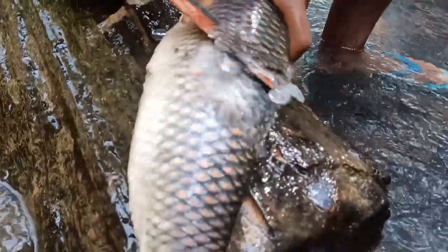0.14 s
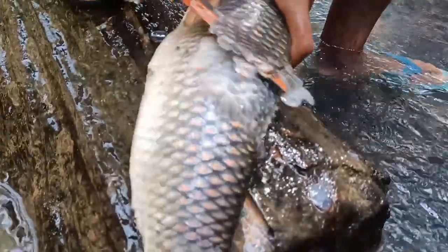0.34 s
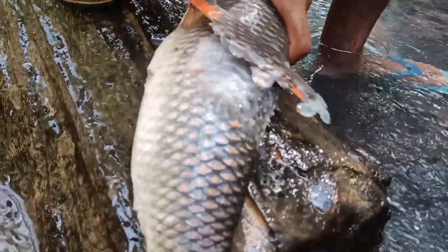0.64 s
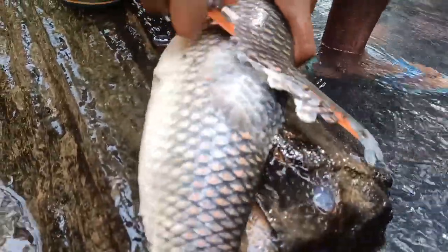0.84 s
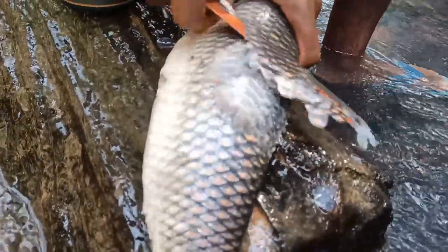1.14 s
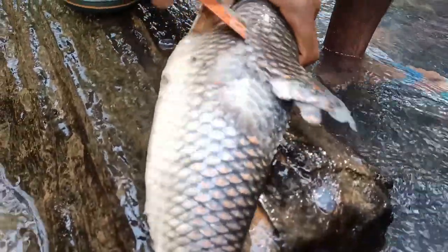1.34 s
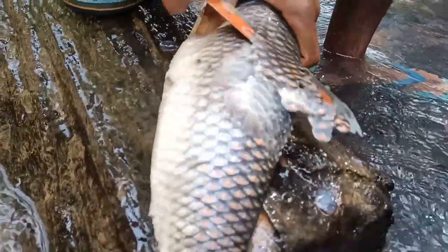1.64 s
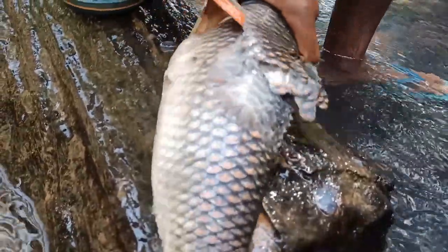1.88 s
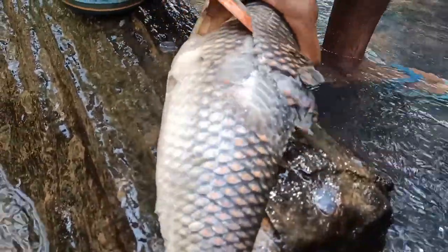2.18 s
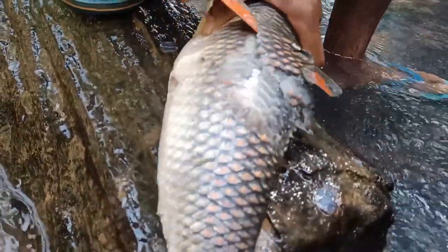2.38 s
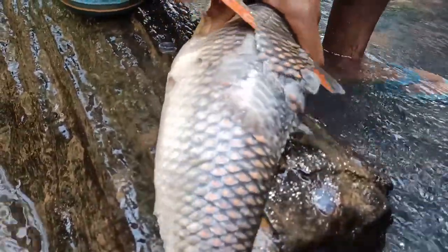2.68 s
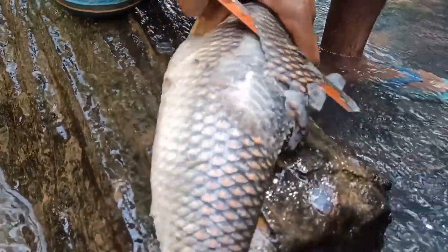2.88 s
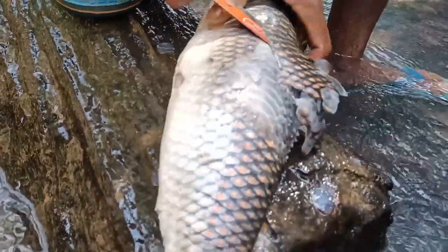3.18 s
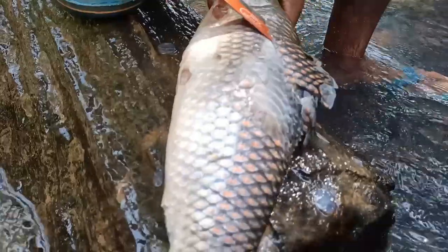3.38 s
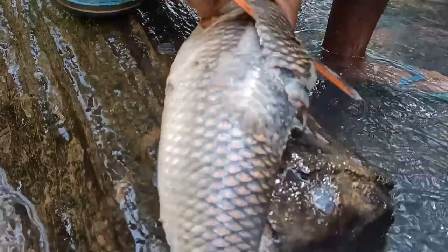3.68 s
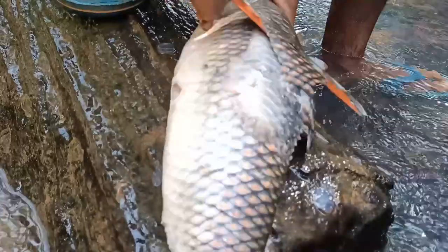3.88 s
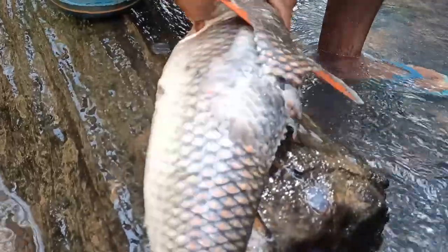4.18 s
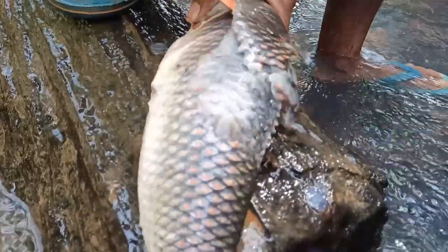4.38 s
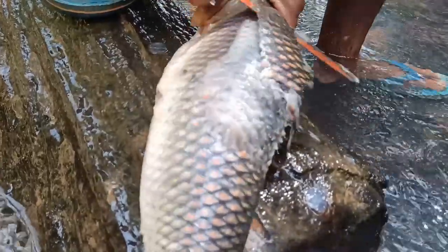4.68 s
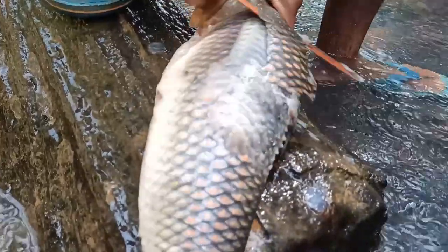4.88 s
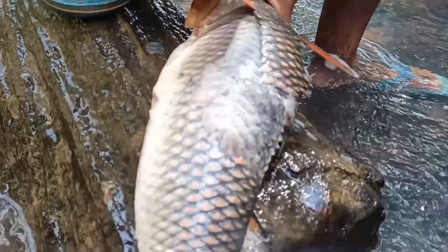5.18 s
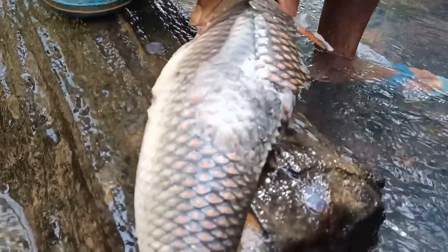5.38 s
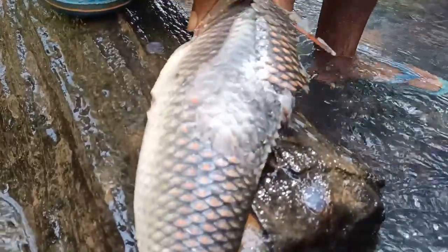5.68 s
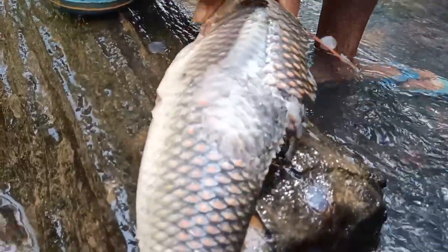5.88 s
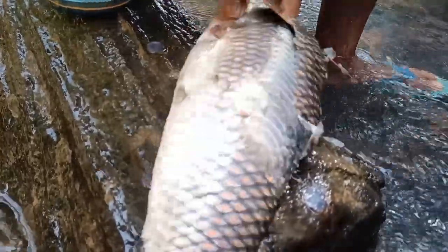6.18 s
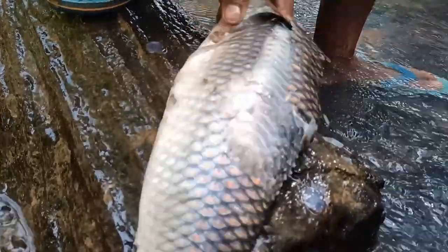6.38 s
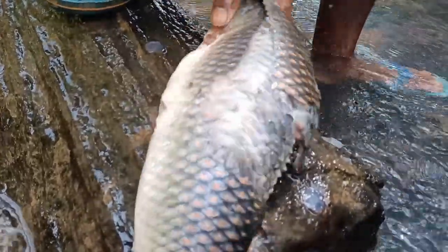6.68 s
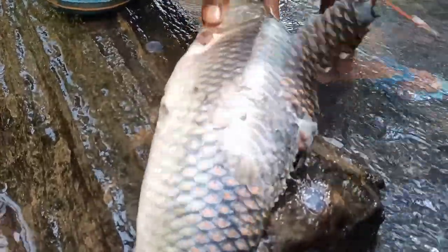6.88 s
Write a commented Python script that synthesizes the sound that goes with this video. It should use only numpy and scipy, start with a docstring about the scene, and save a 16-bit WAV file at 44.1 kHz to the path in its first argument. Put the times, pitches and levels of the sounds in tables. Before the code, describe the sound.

A knife scrapes scales off a big fish in quick, crisp strokes, with sharp little snaps and faint running water behind.

```python
"""Scaling a fish beside a stream

A knife saws to and fro under the scales of a big fish on wet planks. Each stroke is a train of tiny
impacts that swells and fades with the blade's speed; single scales snap loose and the fish knocks on
its support. Midway the blade works deep under the loosened flap, and the scrape turns hollow and louder
on the left. Behind it are quiet running water, a thin insect buzz, swells of hiss and a far bird."""
import sys
import numpy as np
from scipy import signal
from scipy.fft import rfft, irfft, next_fast_len
from scipy.io import wavfile
from scipy.ndimage import map_coordinates

SR = 44100
rng = np.random.default_rng(int(sys.argv[2]) if len(sys.argv) > 2 else 0)


def to_wav(s):
    """Save 16-bit WAV."""
    ch = np.atleast_2d(s).T  # columns
    pcm = np.round(np.clip(ch, -1, 1) * 32767)  # PCM
    wavfile.write(sys.argv[1], SR, pcm.astype(np.int16))


N = 310464

# strokes that bite and taper (jabs) or build and stop short (drags): t/s, length/s, level/dB, pressure/dB
JABS = [(-.07, .11, -27, 6), (.035, .14, -32.5, -5), (.196, 0.13, -21.5, 0.5), (.79, 0.13, -25, 1),
        (1.379, 0.13, -26, 5.5), (1.678, 0.12, -22.5, 2.5), (1.96, 0.14, -26.5, 6), (2.257, .12, -23, .5),
        (2.541, 0.13, -21, -1.5), (2.831, 0.12, -29, 4), (3.123, 0.13, -46, 4.5), (3.528, 0.17, -39, -0.5),
        (3.864, 0.1, -32, -1), (4.141, .13, -30.5, 2), (4.27, 0.16, -37.5, -1), (5.15, 0.15, -30, -2),
        (5.619, 0.13, -37.5, -1.5), (5.899, 0.15, -38, 0.5)]
DRAGS = [(.31, .16, -35.5, -4), (0.486, .13, -28, -2.5), (.632, .13, -32.5, -2), (0.909, .15, -31.5, 0.5),
         (1.08, .13, -26.5, 2.5), (1.216, .14, -29, -6), (1.511, 0.14, -30.5, -0.5), (1.795, .14, -32, 0),
         (2.072, .15, -33, 2.5), (2.358, 0.16, -37.5, -0.5), (2.665, 0.15, -29, -2.5),
         (2.959, .15, -30.5, -1.5), (3.682, .16, -39, -3.5), (3.948, 0.18, -40, -0.5),
         (4.425, 0.15, -22.5, 2), (4.572, .11, -22.5, -1.5), (4.69, .14, -28, -2.5),
         (4.852, 0.12, -25.5, 0), (4.969, .16, -31.5, -5), (5.268, .18, -37, 0), (5.447, .14, -29.5, -8.5),
         (5.764, 0.13, -33, -6), (6.114, .1, -42.5, 1.5), (6.196, 0.18, -39, -2), (6.386, 0.18, -47, -8),
         (6.639, 0.065, -40, -1)]
# spectrum of the scrape on each side: f/Hz, level/dB
SCRAPE_LEFT = [(60, -37), (430, -31.5), (590, -19.5), (770, -32), (1120, -24.5), (2150, -20), (3050, -6),
               (5700, -1.5), (7000, -6.5), (9900, -10), (10800, -3), (12500, -9), (15300, -13.5)]
SCRAPE_RIGHT = [(60, -28.5), (450, -28), (590, -19), (770, -29.5), (1200, -23.5), (1550, -27.5), (2850, -4),
                (5500, -2), (8700, -1.5), (9900, -6.5), (11200, -6), (13100, -5.5), (15300, -13.5)]
BLADE_MODES = [(3010, 300, 1), (7610, 260, -3), (9130, 280, .5), (11770, 400, 1)]  # resonances of blade and grip: f/Hz, width/Hz, gain/dB
PRESSURE_GAIN = [(300, 0.82), (590, 1.28), (850, 0.95), (1500, 0.83), (2400, 1.2), (3000, 0.61), (4000, 0)]  # pressing shakes the fish's body more: f/Hz, gain/(dB per dB)
FLAP_DEPTH = [(0, 0.14), (.6, 0.36), (1.4, 0.24), (3.1, 0), (3.56, 0.94), (4.52, 1), (4.63, 0.51),
              (4.76, 1), (5.1, .95), (5.35, 0.25), (5.85, 0.2), (6.5, 0.32)]  # reach of the blade under the flap: t/s, depth (0-1)
FLAP_COLOUR = [(600, -4.5), (850, -0.5), (1200, 7.5), (1700, 5), (2200, 1.5), (3000, -9.5), (4200, -1.5),
               (6000, 0), (8200, 1), (11000, -4)]  # filtering by the flap at full depth: f/Hz, gain/dB
POCKET_PITCH = [(1.2, 4500), (1.7, 6550), (3, 6000), (3.6, 4400), (4.35, 4300), (4.5, 6070), (5.55, 6700),
                (6.3, 4800)]  # resonance of the pocket between blade and flap: t/s, f/Hz
TREBLE_GAIN = [(.1, 1), (.7, -3), (.86, 6), (1.15, 4), (1.42, 4.5), (1.6, -1), (2.3, -4), (2.87, 0),
               (3.05, -4.5), (3.78, -4), (4.03, 2.5), (4.35, -1.5), (4.85, 2.5), (5.52, -2.5), (5.7, 2),
               (6.3, 6.5)]  # top treble of the scrape: t/s, gain/dB
BLADE_CONTACT = [(0, 3.25), (3.53, 6.7)]  # the blade lies on the fish: start t/s, end t/s
SNAPS = [(.0483, -26.5, 6700), (0.0753, -9.5, 6850), (0.1823, -26, 5300), (.218, -5.5, 6900),
         (0.5873, -4.5, 4700), (0.6266, -20, 8660), (0.7195, -7, 5300), (.794, -28, 5950),
         (1.7125, -14, 6300), (2.2901, -10, 6000), (2.412, -14.5, 4800), (3.098, -9, 7550),
         (3.259, -25.5, 4700), (3.7187, -16.5, 4700), (3.7937, -11.5, 4700), (3.8034, -9, 4700),
         (3.9922, -16.5, 4950), (4.0597, -17, 4400), (4.1698, -12, 6300), (4.5902, -12, 5330),
         (4.606, -3, 8100), (4.975, -22, 5330), (5.013, -17, 5700), (6.082, -32.5, 4600),
         (6.306, -8.5, 8460), (6.676, -15.5, 4100)]  # scales tearing loose: t/s, relative level/dB, f/Hz
SNAP_SPECTRUM = [(100, -35), (1000, -29), (2500, -6.5), (5000, 4), (9000, -3), (15000, -7.5)]  # tick of a scale: f/Hz, level/dB
KNOCKS = [(0.5864, -17.5), (2.2904, -22.5), (3.7928, -15.5), (3.8029, -15), (3.9927, -24), (4.2483, -20),
          (4.606, -17), (6.674, -18.5)]  # the fish bumps its support: t/s, level/dB
KNOCK_SPECTRUM = [(40, -9.5), (200, -13), (600, -8.5), (1600, -4), (3000, -6), (8000, -65.5)]  # thud of the fish: f/Hz, level/dB
STREAM_SPECTRUM = [(25, 0), (150, -0.5), (450, -2.5), (800, -7.5), (1600, -14), (3000, -5.5), (6000, -11.5),
                   (10000, -14.5), (15500, -17.5)]  # running water: f/Hz, level/dB
STREAM_COHERENCE = [(50, 0.11), (300, 0.24), (1000, .3), (4000, .05)]  # left-right likeness of the water: f/Hz, correlation
NEAR_BUBBLES = [(4.005, 485, -51), (5.735, 935, -60)]  # single plops: t/s, f/Hz, level/dB
HISS_SWELLS = [(3.45, 0.1, -62), (6.48, 0.18, -59.5), (6.978, 0.4, -63.5)]  # thin wet hiss: peak t/s, length/s, level/dB
BIRD_CALLS = [(0.564, 0.26, 1136, -65.5, 1), (2.048, 0.21, 1104, -66, 0.7), (3.264, 0.24, 1036, -70, 0.38),
              (4.808, 0.22, 1030, -72.5, 0.04), (6.181, 0.203, 1030, -71.5, 0.48),
              (6.88, .067, 1170, -75.5, .3)]  # far calls: t/s, length/s, f/Hz, level/dB, hoarseness (0-1)

OPEN_LEAD_MS, DEEP_LEAD_MS = 0.11, 0.262  # the sound arrives earlier on the right
HAND_PRESSURE_DB = 1.5  # the hand's weight, added to every stroke


def scraping(strokes, fastest_at, grip_speed, slip_db, rise_power, fall_power):
    """Friction: the blade slips, then bites, and the amplitude follows a power of its speed."""
    out = np.zeros((2, N))
    for start, length, db, pressure_db in strokes:
        progress = np.linspace(0, 1, int(length * SR))
        speed = np.abs(np.sin(np.pi * np.interp(progress, [0, fastest_at, 1], [0, .5, 1])))
        bite = amp(np.interp(speed, [grip_speed, grip_speed + .03], [slip_db, 0]))
        force = np.where(progress < fastest_at, bite * speed ** rise_power, speed ** fall_power)
        middle = start + length / 2
        grains = flicks(speed, density=1900, spread_db=4, slide_db=-3,
                        catch_rate=98, catch_db=-8.5, catch_t60=.028)
        pair = to_stereo(grains, lead_at(middle), scatter_db=1.5, scatter_t60=.023, paths=2)
        scrape = unit(filtered(pair, lambda hz: amp(blade_colour(hz, middle, pressure_db))))
        left_bias_db = np.interp(depth_at(middle), [.3, 1], [0, 3])
        add(out, start, scrape * force * amp(db + left_bias_db * np.array([[.5], [-.5]])))
    return out


def flicks(speed, density, spread_db, slide_db, catch_rate, catch_db, catch_t60):
    """Shot noise: scale edges flick past over wet sliding; each catch sets off a decaying burst."""
    n = len(speed)
    hits = rng.random(n) < density * (.3 + speed) / SR
    sizes = amp(spread_db * np.minimum(rng.standard_normal(n), 2.3)) * rng.choice([-1, 1], n)
    grains = unit(hits * sizes) + amp(slide_db) * rng.standard_normal(n)
    catches = (rng.random(n) < catch_rate / SR) * rng.exponential(size=n)
    bursts = signal.lfilter([1], [1, -amp(-60 / catch_t60 / SR)], catches)
    return unit(grains * (1 + amp(catch_db) * bursts))


def blade_colour(hz, s, pressure_db):
    """Filters in series add in dB: blade, flap, pocket and pressure shape the scrape's spectrum."""
    depth = depth_at(s)
    base = np.array([along(SCRAPE_LEFT, hz), along(SCRAPE_RIGHT, hz)])
    modes = sum(db * resonance(hz, centre, width) for centre, width, db in BLADE_MODES)
    flap = depth * along(FLAP_COLOUR, hz)
    pocket = (2 + 6 * depth) * resonance(hz, at_time(POCKET_PITCH, s), width=860)
    sizzle = along([(7500, .0055), (12500, at_time(TREBLE_GAIN, s))], hz)
    body = (HAND_PRESSURE_DB + pressure_db) * along(PRESSURE_GAIN, hz)
    return base + modes + flap + pocket + sizzle + body


def depth_at(s):
    """How far the flap covers the blade at time s."""
    return np.clip(at_time(FLAP_DEPTH, s), 0, 1)


def lead_at(s):
    """Path difference, in ms: under the flap the sound leaves by its open side, further right."""
    return np.interp(depth_at(s), [.3, .7], [OPEN_LEAD_MS, DEEP_LEAD_MS])


def to_stereo(x, lead_ms, scatter_db, scatter_t60, paths):
    """Direct sound plus scattering off fish, hands and planks, by paths that switch as the blade moves."""
    n = len(x)
    direct = filtered(x, lambda hz: np.exp(1j * np.pi * hz * lead_ms / 1000 * np.array([[-1], [1]])))
    path = rng.integers(paths, size=n // 128 + 1).repeat(128)[:n]
    scatter = sum(signal.fftconvolve([x * (path == k)], echoes(scatter_t60, size=1024), axes=1)[:, :n]
                  for k in range(paths))
    # long waves pass small obstacles by
    return direct + amp(scatter_db) * filtered(scatter, lambda hz: hz / (hz + 700))


def snaps(gain_db, ring_db, ring_width_hz):
    """Sudden release: a scale tears free with a sharp tick at its own resonance."""
    out = np.zeros((2, N))
    grid = np.fft.rfftfreq(512, 1 / SR)
    for s, db, hz in SNAPS:
        spectrum = np.c_[grid, along(SNAP_SPECTRUM, grid) + ring_db * resonance(grid, hz, ring_width_hz)]
        add(out, s, amp(db + gain_db) * impact(spectrum, s, scatter_db=1, scatter_t60=.009))
    return out


def knocks():
    """Impact: a jerk of the knife bumps the fish against its support."""
    out = np.zeros((2, N))
    for s, db in KNOCKS:
        add(out, s, amp(db) * impact(KNOCK_SPECTRUM, s, scatter_db=3.5, scatter_t60=.025))
    return out


def impact(spectrum, s, scatter_db, scatter_t60):
    """A sharp contact radiates the body's impulse response, here in stereo with energy 1."""
    impulse = 1.0 * (np.arange(2048) == 32)
    arrivals = to_stereo(impulse, lead_at(s), scatter_db, scatter_t60, paths=1)
    pair = signal.lfilter(impulse_response(spectrum), 1, arrivals)
    return pair / np.linalg.norm(pair)


def slime_and_loose_scales(ticks_per_s, tick_db, spread_db, drag_db):
    """Light friction: the blade drags in slime and loose scales tick, even between strokes."""
    t = np.arange(N) / SR
    touching = sum((t >= a) & (t < b) for a, b in BLADE_CONTACT)
    start, length, level_db, _ = np.transpose(sorted(map(tuple, [*JABS, *DRAGS])))
    effort = touching * amp(np.interp(t, start + length / 2, level_db))
    hits = rng.random(N) < ticks_per_s / SR
    ticks = hits * amp(tick_db + spread_db * np.minimum(rng.standard_normal(N), 2))
    drag = amp(drag_db + 4 * wobble(11, N)) * rng.standard_normal(N)
    pair = to_stereo((ticks + drag) * effort, OPEN_LEAD_MS, scatter_db=3, scatter_t60=.037, paths=6)
    return signal.fftconvolve(pair, [impulse_response(SNAP_SPECTRUM)], axes=1)[:, :N]


def stream(db, ripple_db):
    """Shallow running water is a spread-out source: partly coherent noise, widest in the treble."""
    def mid_side_gain(hz):
        angle = np.arccos(np.clip(along(STREAM_COHERENCE, hz), -1, 1)) / 2
        return amp(along(STREAM_SPECTRUM, hz)) * [np.cos(angle), np.sin(angle)]
    noise = rng.standard_normal((2, N)) * amp(ripple_db * np.array([wobble(25, N), wobble(25, N)]))
    mid, side = filtered(noise, mid_side_gain)
    return amp(db) * unit(np.array([mid + side, mid - side]))


def bubbles(faint_db, centre_hz, count):
    """Bubbles in the current are damped oscillators of rising pitch, a few near and many faint."""
    out, t = np.zeros((2, N)), np.arange(SR // 16) / SR
    faint = [(when * N / SR, centre_hz * 3 ** (high - .5), faint_db - 12 * far)
             for when, high, far in rng.random((count, 3))]
    for s, hz, db in NEAR_BUBBLES + faint:
        cycles = hz * t * (1 + 2 * t)
        ring = np.sin(2 * np.pi * cycles) * np.exp(-cycles / 11) * (1 - np.exp(-cycles))
        left_share = rng.uniform(.2, .8)
        add(out, s, amp(db) * np.sqrt([[left_share], [1 - left_share]]) * ring)
    return out


def insect(db, pulse_hz):
    """Amplitude modulation: a narrow band of noise buzzes in slow pulses."""
    pulses = np.cos(np.pi * pulse_hz * np.arange(N) / SR) ** 6
    return amp(db + 2 * wobble(9, N)) * pulses * noise_band(8130, half_width_hz=190)


def hiss(ring_db):
    """Band-limited noise comes and goes; a narrower band makes it ring slightly."""
    t = np.arange(N) / SR
    swells = sum(amp(db) * np.exp(-np.square(np.pi * (t - s) / length)) for s, length, db in HISS_SWELLS)
    broad = noise_band(5160, half_width_hz=1200)
    return swells * (broad + amp(ring_db) * noise_band(4430, half_width_hz=200))


def bird(trill_hz, trill_depth, rise):
    """Modulation: a trill pulses a far bird's rising tone, and pitch jitter makes it hoarse."""
    out = np.zeros((2, N))
    for start, length, hz, db, hoarseness in BIRD_CALLS:
        n = int(length * SR)
        progress = np.linspace(0, 1, n)
        trill = np.sin(2 * np.pi * trill_hz * np.arange(n) / SR)
        jitter = .075 * hoarseness * wobble(330, n)
        pitch = hz * (1 + rise * (progress - .5) + trill_depth * trill + jitter)
        envelope = np.sqrt(np.abs(np.sin(np.pi * progress))) * (1 + .57 * trill)
        call = unit(np.sin(2 * np.pi * np.cumsum(pitch) / SR) * envelope)
        add(out, start, amp(db) * np.array([call, call]))
    return out


def amp(db):
    return 10 ** (np.asarray(db) / 20)


def unit(x):
    return x / np.sqrt(np.mean(x ** 2) + 1e-20)


def at_time(points, s):
    return np.interp(s, *np.transpose(points))


def along(points, hz):
    """Interpolation on a logarithmic frequency axis."""
    f, values = np.transpose(points)
    return np.interp(np.log(hz + 1), np.log(f + 1), values)


def resonance(hz, centre, width):
    """A Lorentzian bell, 1 at its centre."""
    return 1 / (1 + (2 * (hz - centre) / width) ** 2)


def wobble(rate, size):
    """A smooth random curve, rate knots a second."""
    return map_coordinates(rng.standard_normal(int(size * rate / SR) + 4), [np.arange(size) * rate / SR])


def filtered(x, response):
    """Linear filtering: the spectrum of x times a frequency response."""
    n = x.shape[-1]
    padded = next_fast_len(n + 4096)
    return irfft(rfft(x, padded) * response(np.fft.rfftfreq(padded, 1 / SR)), padded)[..., :n]


def noise_band(hz, half_width_hz):
    """Band-pass stereo noise of rms 1."""
    return unit(filtered(rng.standard_normal((2, N)), lambda f: 1 / (1 + ((f - hz) / half_width_hz) ** 4)))


def impulse_response(spectrum, size=1024):
    """The minimum-phase response with this spectrum."""
    cepstrum = irfft(np.log(amp(along(spectrum, np.fft.rfftfreq(size, 1 / SR)))))
    cepstrum[1:size // 2] *= 2
    cepstrum[size // 2 + 1:] = 0
    return irfft(np.exp(rfft(cepstrum)))


def echoes(t60, size):
    """Diffuse reflections: an exponentially decaying stereo tail of energy 1."""
    tail = rng.standard_normal((2, size)) * amp(-60 * np.arange(size) / SR / t60)
    return tail / np.linalg.norm(tail, axis=1, keepdims=True)


def add(track, s, sound):
    """Mix a stereo sound in at time s."""
    i = round(s * SR)
    a, b = max(i, 0), min(i + sound.shape[1], N)
    track[:, a:b] += sound[:, a - i:b - i]


def scene():
    """Superposition of the near knife, its faint reflections off the planks and the background."""
    knife = scraping(JABS, fastest_at=.41, grip_speed=.25, slip_db=-8, rise_power=1.66, fall_power=1.75)
    knife += scraping(DRAGS, fastest_at=.67, grip_speed=.33, slip_db=-7, rise_power=1.73, fall_power=1.69)
    knife += snaps(gain_db=9.5, ring_db=14, ring_width_hz=2100) + knocks()
    knife += slime_and_loose_scales(ticks_per_s=60, tick_db=-6, spread_db=7, drag_db=-34)
    planks = amp(-25) * signal.fftconvolve(knife, echoes(t60=.1, size=SR // 2), axes=1)[:, :N]
    water = bubbles(faint_db=-62, centre_hz=520, count=60) + stream(db=-65.5, ripple_db=2.5)
    haze = insect(db=-70.5, pulse_hz=2.96) + hiss(ring_db=-3.5)
    return knife + planks + water + haze + bird(trill_hz=26.6, trill_depth=.015, rise=.06)


def record(dry):
    """Band limiting: a steep low-pass at 15.7 kHz."""
    return filtered(dry, lambda hz: 1 / (1 + (hz / 15700) ** 160))


dry = scene()
out = record(dry)
to_wav(out)
```